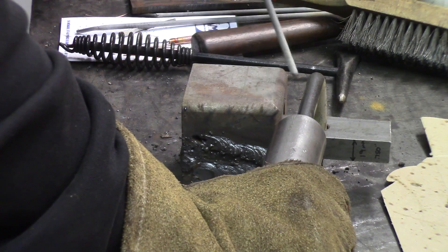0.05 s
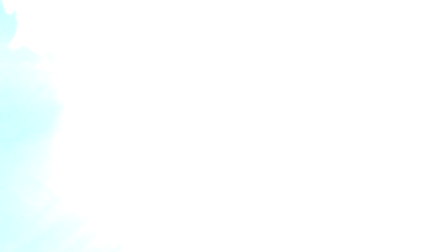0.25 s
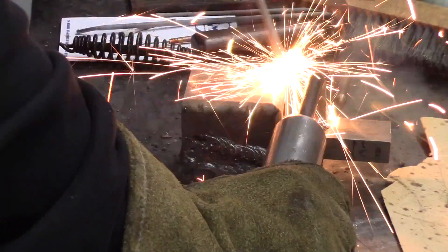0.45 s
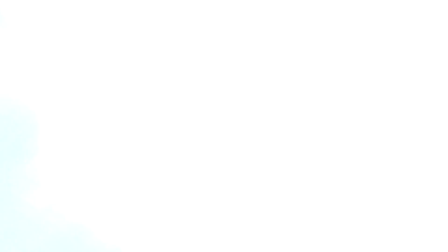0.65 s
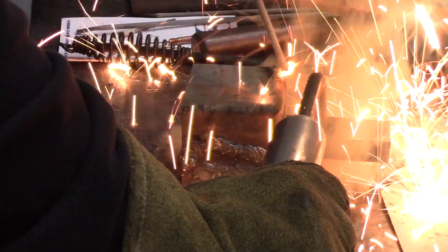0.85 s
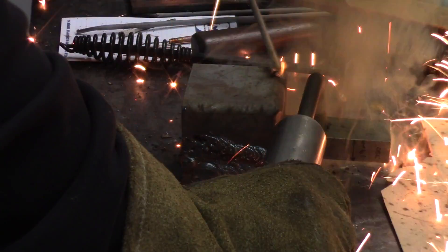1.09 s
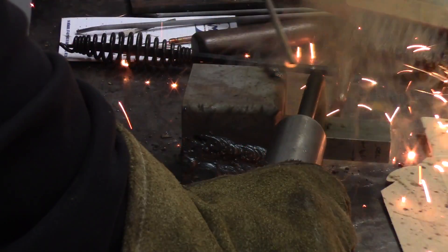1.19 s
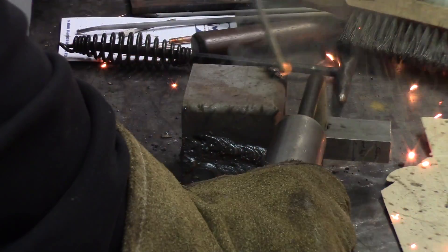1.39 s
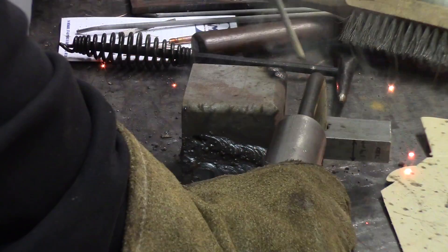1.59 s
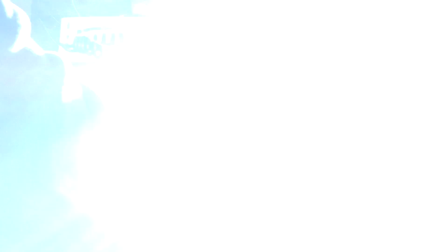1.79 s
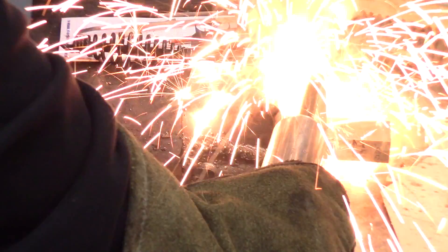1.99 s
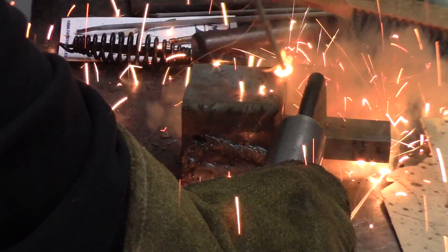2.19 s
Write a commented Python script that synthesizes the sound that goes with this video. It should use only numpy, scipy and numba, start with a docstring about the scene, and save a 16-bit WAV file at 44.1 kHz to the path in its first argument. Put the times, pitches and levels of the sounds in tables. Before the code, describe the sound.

A stick welder strikes three harsh arcs that pop, roar and sputter on a steel block

```python
"""Three welding arcs in a garage

One channel, close to a steel block on a bench: the direct sound is well above the short room tail.
A stick welder strikes three short arcs. Each lights with a pop and a puff of air, hisses as the rod
heats, then roars and sputters as metal and coating boil off: random clicks, filtered and ringing the bench.
The set's cooling fan and mains hum (filtered noise, sines) run behind, ducked by the recorder's gain control."""
import sys
import numpy as np
from scipy import signal
from scipy.fft import rfft, irfft
from scipy.io import wavfile
from numba import njit

SR = 44100
rng = np.random.default_rng(int(sys.argv[2]) if len(sys.argv) > 2 else 0)


def unload_wav(signal):
    """Save mono or channel-first audio to the path in sys.argv[1] as 16-bit WAV at rate SR, clipped to [-1, 1]."""
    wavfile.write(
        sys.argv[1],
        SR,
        np.round(np.clip(np.atleast_2d(signal).T, -1, 1) * 32767).astype(np.int16),
    )


N = 99225

# cooling fan spectrum (f/Hz, relative level/dB)
FAN_SPECTRUM = [(15, -31), (25, -3.5), (66, -14), (206, -15.5), (229, -0.5), (301, -16), (405, -9.5),
                (516, -2.5), (624, -10), (1020, -7.5), (1160, -12.5), (2910, -19.5), (3430, -23.5),
                (4030, -23), (16000, -48)]
# resonances of the fan's case (f/Hz, width/Hz, boost/dB)
CASE_RINGS = [(386.6, 62, 14), (502.4, 83, 6), (2840, 180, 3.5)]
# mains hum of the welding set (f/Hz, rms level/dB)
MAINS_HUM = [(60, -56), (120, -59)]
FAN_DB = -40.5  # rms

# resonances of the bench and the things on it (f/Hz, width/Hz, boost/dB)
BENCH_RINGS = [(283, 36, 5), (365, 36, 3), (408, 36, 3), (498, 50, 5), (616, 50, 5), (792, 40, 8),
               (905, 40, 4), (1032, 40, 6), (1140, 30, 4), (1298, 40, 8), (1657, 40, 7), (1890, 70, 6),
               (2865, 40, 7), (4528, 60, 6)]

# dull knocks of handling at the bench (t/s, peak level/dB)
KNOCKS = [(1.073, -28.5), (1.098, -21.5), (1.493, -27.5), (1.506, -28)]
# spectrum of one knock (f/Hz, relative level/dB)
KNOCK_SPECTRUM = [(30, -17), (70, -0.5), (130, 3), (250, -6.5), (600, -13), (2000, -23), (5000, -72),
                  (16000, -59)]
# ticks of the rod touching and of spatter landing (t/s, peak level/dB, centre f/Hz, width/octaves)
TICKS = [(0.1967, -27, 4000, 3.6), (0.2011, -21, 4000, 1.7), (0.5129, -17.5, 2470, 2),
         (0.515, -21, 2500, 1.9), (1.072, -23.5, 4570, 0.82)]
KNOCK_DECAY_S, TICK_DECAY_S = 0.054, 0.0012

# hot spatter fizzling after an arc goes out (f/Hz, relative level/dB)
SPATTER_SPECTRUM = [(100, -4.5), (500, 5.5), (1500, -3.5), (4000, -13.5), (9000, -24.5), (16000, -32)]
SPATTER_DB, SPATTER_HOLD_S, SPATTER_FADE_S = -37.5, 0.14, 0.022

# the moments the arcs light (t/s, air puff level/dB, bright fizz level/dB)
IGNITIONS = [(0.205, 1, -10), (.529, -6, -35), (1.739, -3.5, -28.5)]
# spectrum of the lighting fizz (f/Hz, relative level/dB)
FIZZ_SPECTRUM = [(3000, -20), (6000, 1), (8200, -7), (10300, 3.5), (12500, -1.5), (15500, -13.5)]
FIZZ_HOLD_S, FIZZ_FADE_S = 0.025, 0.011
PUFF_HZ, PUFF_RISE_S, PUFF_DECAY_S = 12.4, 0.0037, 0.024

# loud pops of gas and bursting droplets (t/s, peak level/dB)
POPS = [(0.208, 2.5), (.3735, 0), (0.3961, -4), (0.528, -8.5), (0.6763, 2), (1.7416, 6), (1.869, 2.5),
        (1.882, -1), (1.927, 5), (1.937, 5.5)]
# spectrum of one pop before the bench rings (f/Hz, relative level/dB)
POP_SPECTRUM = [(30, -17.5), (150, 0), (450, 12.5), (700, 0.5), (1200, -11), (2500, -21.5), (6000, -77.5),
                (16000, -62)]
POP_DECAY_S = 0.0021

# level curves of each arc, lighting to going out (t/s, roar level/dB, sputter level/dB, hiss level/dB)
FIRST_ARC = [(0.206, -31, -18.5, -25.5), (0.222, -34, -28.5, -20.5), (0.237, -9.5, -21, -14),
             (0.254, -23.5, -16, -27), (0.277, -9.5, -20, -27.5), (0.31, -12.5, -22.5, -33.5),
             (0.348, -9, -26, -33), (0.376, -18.5, -24.5, -34.5), (0.402, -18, -40, -40)]
SECOND_ARC = [(0.527, -36, -23.5, -26), (0.545, -34, -26.5, -28.5), (0.579, -18, -24.5, -26),
              (0.605, -15.5, -16, -22), (0.639, -12.5, -15.5, -26), (0.674, -17, -21, -31.5),
              (0.707, -36, -34, -40.5)]
THIRD_ARC = [(1.74, -18, -16.5, -30.5), (1.761, -18, -31.5, -26), (1.785, -26, -33.5, -29.5),
             (1.819, -30, -21.5, -19), (1.86, -15, -21, -23), (1.9, -20.5, -17, -27),
             (1.932, -12.5, -20.5, -27), (1.95, -18.5, -18.5, -44), (1.977, -23.5, -26.5, -38.5),
             (2.0, -30, -29, -51)]
ARCS = (FIRST_ARC, SECOND_ARC, THIRD_ARC)
# spectra of the arc's four layers (f/Hz, relative level/dB)
ROAR_SPECTRUM = [(40, -18.5), (130, -10.5), (220, -7.5), (300, -8.5), (450, 0), (620, -1), (800, -5),
                 (1050, -6.5), (1600, -19), (4000, -43)]
SPUTTER_SPECTRUM = [(400, -4.5), (800, 1.5), (1150, 2), (1900, -2), (2300, -4.5), (2900, -7.5),
                    (3600, -16.5), (9000, -49.5)]
HISS_SPECTRUM = [(1500, -8.5), (3000, -1), (4300, 2), (6200, -3), (8200, -7.5), (10300, -9), (12500, -13),
                 (15500, -26.5)]
RUMBLE_SPECTRUM = [(8, -16.5), (22, 9.5), (45, -11.5), (85, -1), (150, -6), (400, -35.5)]
ROAR_DB, SPUTTER_DB, HISS_DB, RUMBLE_DB = 10.5, 11, 10.5, -5.5  # lift of each layer over its curve
LIGHT_S, QUENCH_S = 0.0016, 0.0042  # rise of every held sound; fade of an arc
BURSTS_PER_S, SPITS_PER_S, SIZZLES_PER_S = 1100, 3000, 12000
# the roar's peak slides down as the plume grows
PLUME_START_HZ, PLUME_END_HZ, PLUME_GROWTH_S = 1600, 480, 0.048
PLUME_WIDTH, PLUME_DB = 0.55, 4  # bandwidth over centre, level of the added band

ROOM_T60_S, ROOM_TREBLE_T60_S = 0.2, 0.22
ROOM_DB, ROOM_GAP_S = -8.5, 0.00247  # tail level, delay after the direct sound

LIMIT_DB, GAIN_RANGE_DB = -28, 11.5  # where ducking starts, deepest cut
DETECTOR_S, GAIN_ATTACK_S, GAIN_HOLD_S, GAIN_RISE_DB_PER_S = 0.004, 0.001, 0.19, 52
CEILING, SELF_NOISE_DB, TOP_HZ = 0.9, -64, 15750


def undb(db):
    """Decibels to gain."""
    return 10 ** (np.asarray(db) / 20)


def unit(x):
    """Scale to rms 1."""
    return x / np.sqrt(np.mean(x ** 2))


def colour(x, points, rings=()):
    """Minimum-phase filter from (f/Hz, level/dB) points, plus resonances (f/Hz, width/Hz, boost/dB)."""
    size = 2 ** 14
    f = np.maximum(np.fft.rfftfreq(size, 1 / SR), 1)
    hz, db = np.array(points, float).T
    shape_db = np.interp(np.log(f), np.log(hz), db)
    for centre, width, boost in rings:
        shape_db = shape_db + boost / (1 + (2 * (f - centre) / width) ** 2)
    # folding the cepstrum forward makes the filter causal
    cepstrum = irfft(np.log(undb(shape_db)))
    cepstrum[1:size // 2] *= 2
    cepstrum[size // 2 + 1:] = 0
    impulse_response = irfft(np.exp(rfft(cepstrum)))
    return signal.oaconvolve(x, impulse_response)[:N]


@njit
def bandpass(x, hz, width):
    """State-variable band-pass with a moving centre."""
    y, band, low = np.empty(len(x)), 0., 0.
    for i in range(len(x)):
        g = np.tan(np.pi * hz[i] / SR)
        v = (band + g * (x[i] + 1e-18 - low)) / (1 + g * (g + width))
        band, low, y[i] = 2 * v - band, low + 2 * g * v, width * v
    return y


def crackle(rate, scatter_db):
    """Tiny explosions at random moments, of uneven size and either sign."""
    happens = rng.random(N) < rate / SR
    size = undb(scatter_db * np.clip(rng.standard_normal(N), -2, 2))
    return happens * size * rng.choice([-1, 1], N)


def fade(start, decay):
    """Sudden start and exponential decay."""
    age = np.arange(N) / SR - start
    return (age >= 0) * np.exp(-np.maximum(age, 0) / decay)


def held(t, start, hold, release):
    """Quick rise, hold and exponential release."""
    rise = np.clip((t - start) / LIGHT_S, 0, 1)
    return rise * np.exp(-np.maximum(t - start - hold, 0) / release)


def blow(start, decay, points, rings=(), scatter=.1):
    """An impulse and its short scattered tail, coloured, with peak 1."""
    x = scatter * fade(start, decay) * rng.standard_normal(N)
    x[int(start * SR)] += 1
    x = colour(x, points, rings)
    return x / np.abs(x).max()


def welding_set(t):
    """Fan noise in a ringing case, over mains hum."""
    fan = undb(FAN_DB) * unit(colour(rng.standard_normal(N), FAN_SPECTRUM, CASE_RINGS))
    hum = np.zeros(N)
    for hz, db in MAINS_HUM:
        hum += undb(db) * np.sqrt(2) * np.sin(2 * np.pi * (hz * t + rng.random()))
    return fan + hum


def garage(x):
    """Direct sound and a dense short reverberation, its bass and treble decaying at their own rates."""
    noise = rng.standard_normal(N)
    low = signal.sosfilt(signal.butter(2, 2500, fs=SR, output="sos"), noise)
    high = signal.sosfilt(signal.butter(2, 2500, "high", fs=SR, output="sos"), noise)
    low_tail = low * fade(ROOM_GAP_S, ROOM_T60_S / np.log(1000))
    high_tail = high * fade(ROOM_GAP_S, ROOM_TREBLE_T60_S / np.log(1000))
    tail = low_tail - high_tail  # opposite signs keep the bands from cancelling at the crossover
    return x + undb(ROOM_DB) * signal.fftconvolve(x, tail / np.linalg.norm(tail))[:N]


def knocks():
    """Dull knocks of handling: impulses with a faint noisy tail."""
    return sum(undb(db) * blow(s, KNOCK_DECAY_S, KNOCK_SPECTRUM, scatter=0.019) for s, db in KNOCKS)


def tick(start, hz, octaves):
    """A short snap with one broad hump in its spectrum."""
    f = np.geomspace(100, 16000, 40)
    hump_db = np.maximum(-12 * (np.log2(f / hz) / octaves) ** 2, -28)
    return blow(start, TICK_DECAY_S, list(zip(f, hump_db)), scatter=.6)


def ticks():
    """Snaps of the rod touching and of spatter landing."""
    return sum(undb(db) * tick(s, hz, octaves) for s, db, hz, octaves in TICKS)


def spatter(t):
    """Faint fizzling of hot sparks after each arc: uneven random clicks."""
    glow = sum(held(t, arc[-1][0], SPATTER_HOLD_S, SPATTER_FADE_S) for arc in ARCS)
    return undb(SPATTER_DB) * glow * unit(colour(crackle(SPITS_PER_S, scatter_db=7.5), SPATTER_SPECTRUM))


def ignitions(t):
    """A slow swing of air pressure and a brief bright fizz as each arc lights."""
    fizz = unit(colour(crackle(SIZZLES_PER_S, scatter_db=-4), FIZZ_SPECTRUM))
    total = np.zeros(N)
    for s, puff_db, fizz_db in IGNITIONS:
        swing = np.cos(2 * np.pi * PUFF_HZ * (t - s))
        puff = fade(s, PUFF_DECAY_S) * swing * (1 - fade(s, PUFF_RISE_S))
        total += undb(puff_db) * puff
        total += undb(fizz_db) * fizz * held(t, s, FIZZ_HOLD_S, FIZZ_FADE_S)
    return total


def pops():
    """Single gas explosions that shake the bench."""
    return sum(undb(db) * blow(s, POP_DECAY_S, POP_SPECTRUM, BENCH_RINGS, scatter=0.02) for s, db in POPS)


def arc_layer(drive, level, points, rings=()):
    """Shape the drive by its level before filtering, so resonances ring on; steady level 1 gives rms 1."""
    return colour(drive * level, points, rings) / np.std(colour(drive, points, rings))


def arcs(t):
    """Gas bursts roar in a growing plume, droplets spit, the plasma hisses and hot air rumbles."""
    levels, plume_hz = np.zeros((3, N)), np.full(N, float(PLUME_END_HZ))
    for arc in ARCS:
        times, *curves = np.array(arc).T
        burning = held(t, times[0], times[-1] - times[0], QUENCH_S)
        levels += burning * undb([np.interp(t, times, curve) for curve in curves])
        plume_hz += (PLUME_START_HZ - PLUME_END_HZ) * fade(times[0], PLUME_GROWTH_S)
    roar, sputter, hiss = levels
    bursts = crackle(BURSTS_PER_S, scatter_db=2)
    spits = crackle(SPITS_PER_S, scatter_db=2)
    sizzle = crackle(SIZZLES_PER_S, scatter_db=2)
    bursts = bursts + undb(PLUME_DB) * bandpass(bursts, plume_hz, float(PLUME_WIDTH))
    hot_air = rng.standard_normal(N)
    return (undb(ROAR_DB) * arc_layer(bursts, roar, ROAR_SPECTRUM, BENCH_RINGS)
            + undb(SPUTTER_DB) * arc_layer(spits, sputter, SPUTTER_SPECTRUM, BENCH_RINGS)
            + undb(HISS_DB) * arc_layer(sizzle, hiss, HISS_SPECTRUM, BENCH_RINGS)
            + undb(RUMBLE_DB) * arc_layer(hot_air, np.sqrt(roar * sputter), RUMBLE_SPECTRUM))


def scene():
    """Arcs, sparks and handling in the room, over the running welding set, which gets no reverberation."""
    t = np.arange(N) / SR
    at_the_bench = knocks() + ticks() + spatter(t) + ignitions(t) + pops() + arcs(t)
    return (welding_set(t) + garage(at_the_bench))[None]


@njit
def duck(over, attack, hold, rise):
    """Gain that drops on peaks over the limit, waits while the sound stays loud, then climbs back."""
    gain, cut, wait = np.empty(len(over)), 1., 0.
    for i in range(len(over)):
        if over[i] > cut:
            cut += (over[i] - cut) * attack
        wait = hold if over[i] > .5 * cut else wait - 1
        if wait < 0:
            cut = max(1., cut * rise)
        gain[i] = 1 / cut
    return gain


def record(dry):
    """Automatic gain control of limited range, rounded peaks, faint electronic hiss and a steep top cut."""
    keep = np.exp(-1 / (DETECTOR_S * SR))
    loudness = np.sqrt(signal.lfilter([1 - keep], [1, -keep], dry[0] ** 2))
    over = np.minimum(loudness / undb(LIMIT_DB), undb(GAIN_RANGE_DB))
    rise_per_sample = float(undb(-GAIN_RISE_DB_PER_S / SR))
    gain = duck(over, 1 / (GAIN_ATTACK_S * SR), float(GAIN_HOLD_S * SR), rise_per_sample)
    rounded = CEILING * np.tanh(dry * gain / CEILING)
    out = rounded + undb(SELF_NOISE_DB) * rng.standard_normal(N)
    return signal.sosfilt(signal.ellip(10, .2, 70, TOP_HZ, fs=SR, output="sos"), out)


dry = scene()
out = record(dry)
unload_wav(out)
```